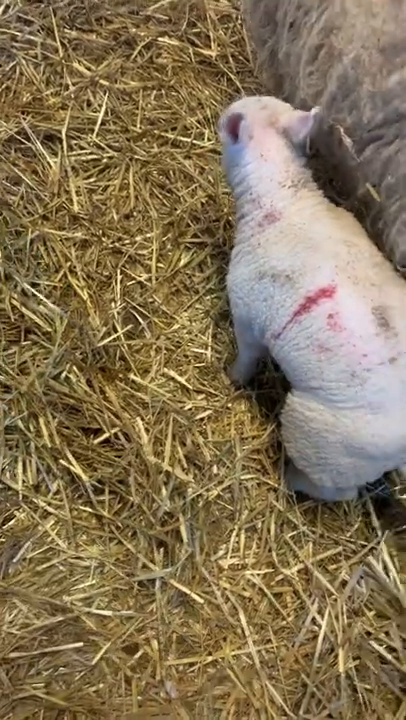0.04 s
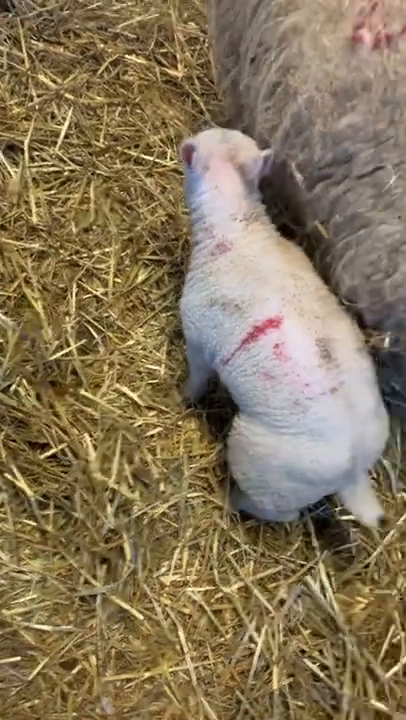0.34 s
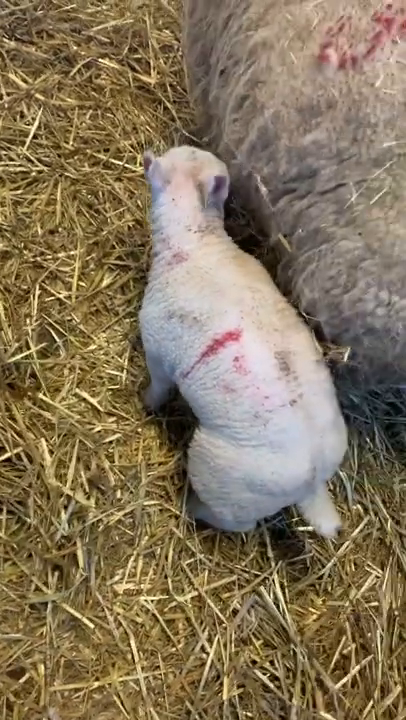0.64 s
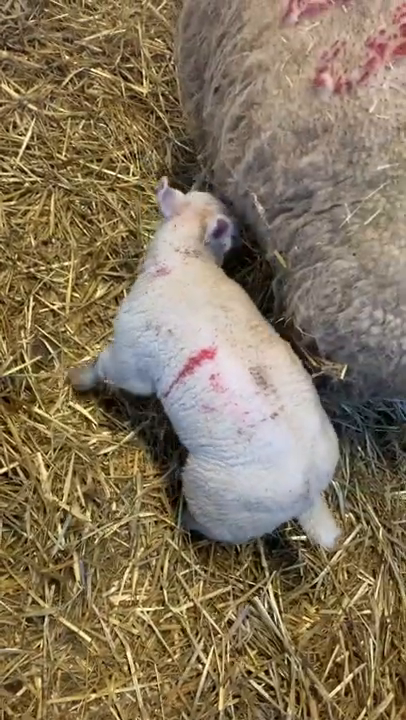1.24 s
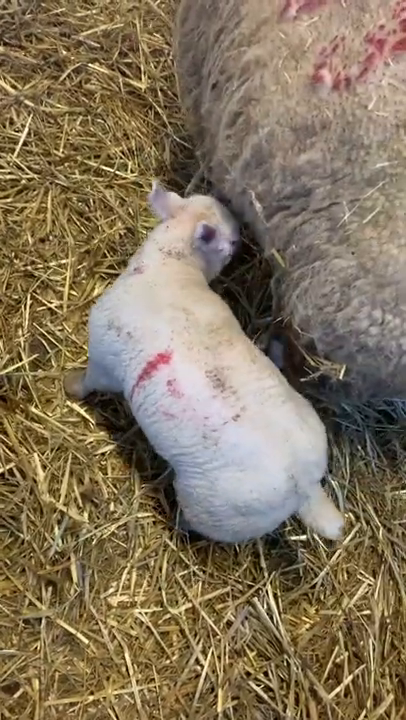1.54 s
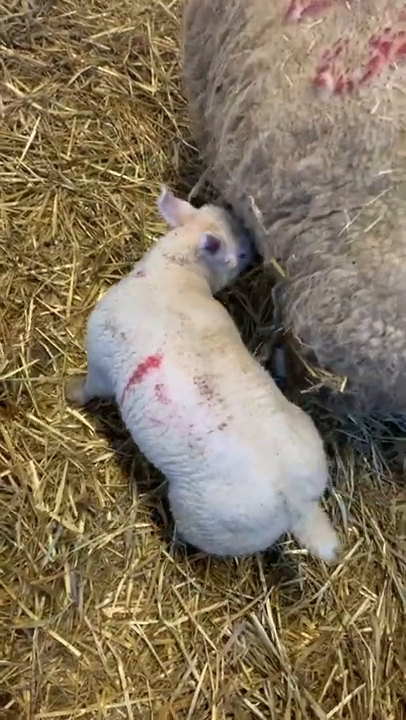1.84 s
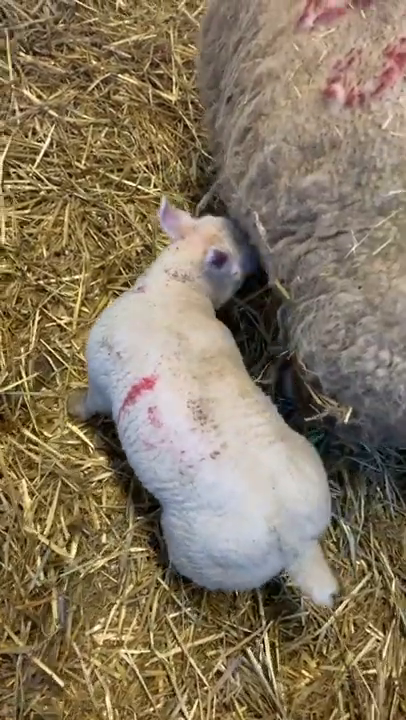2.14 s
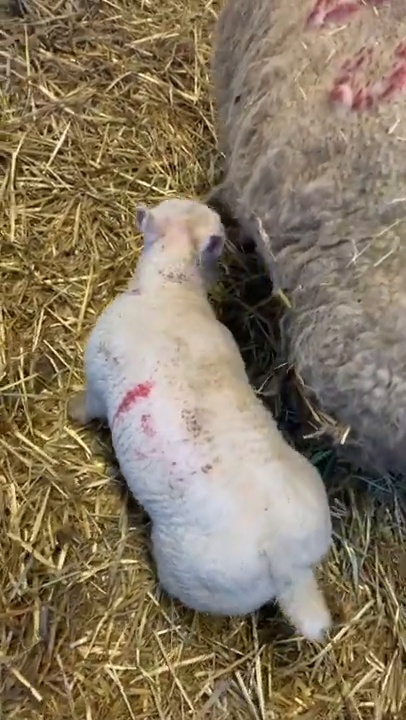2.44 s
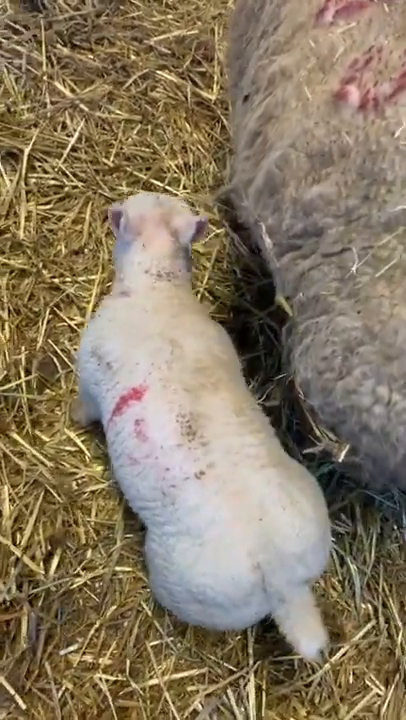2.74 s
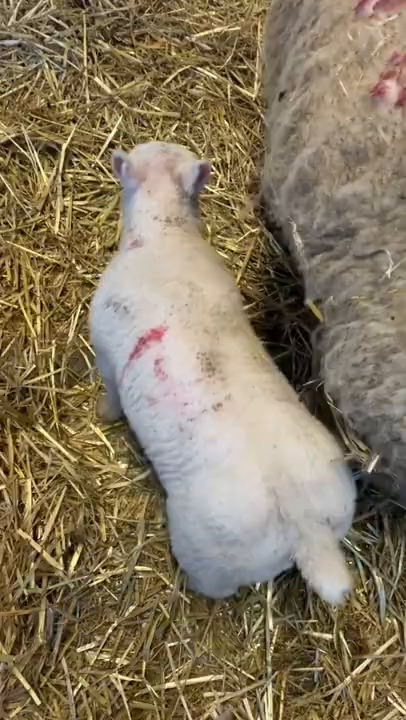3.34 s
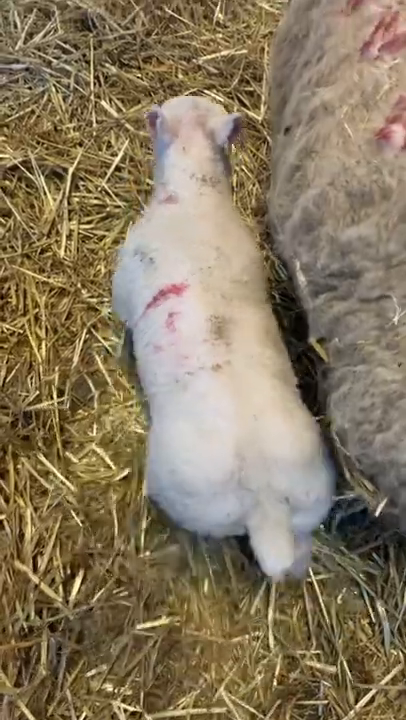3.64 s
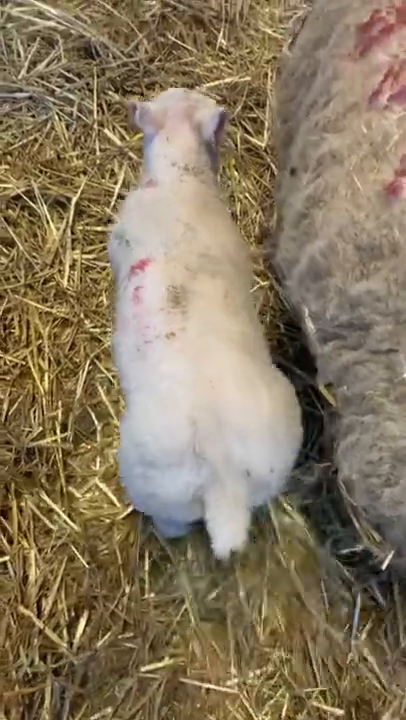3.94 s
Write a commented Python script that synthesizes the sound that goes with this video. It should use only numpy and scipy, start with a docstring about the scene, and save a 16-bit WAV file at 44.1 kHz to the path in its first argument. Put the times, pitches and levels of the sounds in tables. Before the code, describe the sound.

Straw rustles and crackles softly as a lamb shifts about, over a faint handling rumble.

```python
"""Straw rustles as a lamb shifts about in its pen, close to a hand-held pair of microphones.
Stalks slide over each other in an airy hiss that swells and fades. Single stalks tick, scrape
and snap, and about halfway through the straw crunches as the lamb presses on it.
The hand holding the microphones adds a low rumble; hand and hooves add a few soft bumps."""
import sys
import numpy as np
from scipy import signal
from scipy.fft import rfft, irfft
from scipy.io import wavfile

SR = 44100
rng = np.random.default_rng(int(sys.argv[2]) if len(sys.argv) > 2 else 0)


def transcribe(u):
    """Save the signal u as a 16-bit wav file named by the first command-line argument.

    u: samples, shape (n,) or (channels, n), limited to [-1, 1]; the rate is SR.
    q: integer samples, one column per channel.
    """
    v = np.clip(np.atleast_2d(u).T, -1, 1)
    q = np.round(v * 32767).astype(np.int16)
    wavfile.write(sys.argv[1], SR, q)


N = 176400

# How the rustle swells and fades (time [s], hiss level [dB], whoosh level [dB], top treble level [dB])
RUSTLE_LEVELS = [(0, -51.5, -58.5, -58), (.13, -49, -59.5, -52), (.31, -41, -55, -44), (.43, -50, -56, -53),
                 (.56, -47.5, -57, -54), (.61, -54, -64.5, -61), (.69, -56, -62.5, -65.5),
                 (.76, -48, -59, -56), (.84, -51.5, -62.5, -60), (1.02, -40, -59.5, -48.5),
                 (1.1, -43, -60, -48.5), (1.18, -51.5, -61, -58.5), (1.3, -53.5, -64, -55),
                 (1.54, -42, -56.5, -47), (1.82, -44, -58, -48), (1.87, -49, -64, -59),
                 (2.05, -56.5, -67.5, -66), (2.11, -56.5, -54.5, -72), (2.2, -56.5, -63.5, -68),
                 (2.34, -57.5, -67, -85), (2.5, -54, -70.5, -60), (2.6, -56, -66.5, -65),
                 (2.75, -47, -66, -52.5), (2.88, -55, -69, -66), (2.97, -51, -64.5, -63),
                 (3.07, -43.5, -64, -49.5), (3.16, -49.5, -59, -54), (3.29, -50.5, -60.5, -53),
                 (3.33, -43, -57, -45.5), (3.39, -40.5, -53, -40.5), (3.48, -38.5, -48, -41.5),
                 (3.59, -48, -56, -48), (3.65, -51.5, -67, -61), (3.81, -50, -61.5, -49.5),
                 (3.88, -48.5, -60.5, -45.5), (3.99, -43.5, -58, -48.5)]
# Tone colours of those three parts (frequency [Hz], level [dB])
HISS_COLOUR = [(1000, -18), (2200, -12), (3300, -2.5), (4500, -0.5), (6300, 1), (7500, -2.5), (8500, -2),
               (11000, -5.5), (13000, -31), (16000, -38)]
WHOOSH_COLOUR = [(200, -17), (450, -6), (900, -1), (1500, 0.5), (2200, -4), (3500, -9.5), (7000, -43)]
TOP_COLOUR = [(7000, -34), (10500, 0.5), (12500, -1.5), (14200, -0.5), (15600, 0), (17000, -22)]
# How the hand's noise swells and fades (time [s], rumble level [dB], rub level [dB])
HAND_LEVELS = [(0, -60.5, -68), (.35, -64, -57), (.43, -57.5, -62), (.56, -57, -56.5), (.68, -63.5, -71),
               (.78, -56.5, -64), (.85, -69.5, -67), (1.03, -58.5, -65.5), (1.35, -54, -60.5),
               (1.71, -61.5, -67), (2.25, -62, -65), (2.33, -68.5, -68), (2.62, -55.5, -69.5),
               (2.88, -55.5, -68.5), (3.12, -53.5, -56.5), (3.32, -62.5, -69.5), (3.59, -63, -59.5),
               (3.67, -61.5, -71.5), (3.99, -61.5, -74)]
# Tone colours of those two parts (frequency [Hz], level [dB])
RUMBLE_COLOUR = [(20, -54), (36, -19), (52, 0.5), (90, -2), (140, -4.5), (200, -13.5), (400, -43),
                 (1200, -70)]
RUB_COLOUR = [(80, -29), (180, 1), (300, -3.5), (450, -5), (800, -16.5), (2500, -60)]
# Short scrapes (time [s], length [s], level [dB], centre pitch [Hz])
SCRAPES = [(.315, 0.1, -54, 1230), (0.737, 0.075, -57, 422), (1.295, 0.059, -56, 600),
           (2.093, 0.025, -54, 1300), (2.203, 0.021, -49.5, 6500), (2.559, 0.011, -54, 5900),
           (3.083, 0.054, -50, 312), (3.171, 0.086, -55.5, 326), (3.357, 0.27, -47.5, 2920),
           (3.843, 0.016, -38.5, 7000)]
# Thuds of hand and hooves (time [s], pitch [Hz], level [dB], fade time [s])
THUDS = [(0.451, 140, -40, 0.0089), (0.556, 256, -47, 0.013), (0.59, 109.6, -40, 0.019),
         (1.303, 123, -42, 0.014), (1.393, 120, -40, .016), (1.534, 108, -40.5, 0.023),
         (1.852, 76, -42, 0.014), (2.155, 180.3, -43.5, 0.026), (3.061, 105, -43, .018),
         (3.084, 293, -30, 0.0034), (3.086, 89, -37.5, 0.017), (3.19, 215, -49, 0.016)]
# Stalks breaking or flicking (time [s], knock level [dB], crack level [dB], knock pitch [ratio])
STALK_SNAPS = [(0.548, -75, -45, 2.6), (0.757, -70, -53.5, 2), (1.0196, -67, -37.5, 2.4),
               (1.2998, -57, -46.5, 2.2), (1.3339, -59, -47, 2), (1.4326, -51, -45, 2.3),
               (1.519, -56, -38, 2), (1.6122, -51, -43, 1.4), (1.6245, -51, -47, 1.1),
               (1.9642, -60, -46.5, 1.94), (2.0876, -41.5, -42, 1), (2.095, -41, -42, 0.97),
               (2.1216, -57, -45.5, 1.5), (2.163, -64, -53, 2.3), (2.1925, -55, -51, 1),
               (2.2382, -56, -44.5, 2.04), (2.2759, -53, -44, 2.57), (2.358, -59.5, -51.5, 0.69),
               (2.5619, -52, -46.5, 2.2), (2.9434, -76, -51.5, 1.8), (3.0898, -62, -44.5, 2.3),
               (3.2345, -53, -46, 2.2), (3.38, -62, -37, 3.2), (3.6024, -46, -45, 1.23),
               (3.6081, -39, -33.5, 1.58), (3.6137, -47, -49, 1.34), (3.8432, -67, -52, 4.3),
               (3.876, -68, -42.5, 3)]
# Tones a stalk rings with at pitch ratio 1 (frequency [Hz], level [dB], fade time [s])
STALK_TONES = [(967, -0.5, 0.0014), (1880, -4.5, 0.0012), (2290, -1, 0.00093), (2970, -3.5, 0.00084)]
# Tone colour of cracking straw (frequency [Hz], level [dB])
CRACK_COLOUR = [(800, -33), (2200, -29), (3500, -1), (6500, 0), (9000, -7), (11500, -2.5), (16000, -5.5)]
# How alike the two microphones sound (frequency [Hz], likeness [0 to 1])
MIC_LIKENESS = [(50, 1), (140, 0.96), (300, 0.75), (700, 0.24), (1500, 0.34), (2600, 1), (3600, 0.81),
                (4600, 1), (9000, 1), (15000, 0.79)]
# How far the wave at the left microphone is ahead (frequency [Hz], phase lead [radians])
LEFT_LEAD = [(0, 0), (300, .05), (1000, .8), (1900, 1.2), (2500, 1.9), (3500, 1.7), (4700, 3.14),
             (6950, 6.28), (8950, 9.42), (11100, 12.57), (13100, 15.71), (15300, 18.85), (17000, 21)]

CRACK_FADE_S, SNAP_DELAY_S = .0006, .0008
LEAN_RIGHT_DB = [[-.8], [.8]]  # left, right


def gain(db):
    """Turns decibels into a number to multiply a sound by."""
    return 10 ** (np.asarray(db) / 20)


def normalise(x):
    """Scales a signal to an average strength (rms) of 1."""
    return x / np.sqrt(np.mean(x ** 2) + 1e-20)


def look_up(table, hz):
    """Reads between the rows of a frequency table, spacing them as the ear hears pitch."""
    freqs, values = np.transpose(table)
    return np.interp(np.log(hz + 1), np.log(freqs + 1), values)


def loudness_curves(table):
    """Makes one gain curve for each level column of a time table."""
    times, *columns = np.transpose(table)
    return [gain(np.interp(np.arange(N) / SR, times, column)) for column in columns]


def add(mix, start_s, sound):
    """Mixes a stereo sound in at the given time."""
    part = mix[:, round(start_s * SR):][:, :sound.shape[1]]
    part += sound[:, :part.shape[1]]


def at_microphones(pair, colour):
    """Colours two unrelated signals and blends them into what two spaced microphones hear, at rms 1."""
    size = pair.shape[1]
    hz = np.fft.rfftfreq(size, 1 / SR)
    left, other = rfft(pair) * gain(look_up(colour, hz))
    likeness = np.clip(look_up(MIC_LIKENESS, hz), 0, .995)
    right = likeness * left + np.sqrt(1 - likeness ** 2) * other
    lag = np.exp(-1j * np.interp(hz, *np.transpose(LEFT_LEAD)))
    return normalise(irfft(np.array([left, right * lag]), size))


def patchy(pair, depth_db, width_hz, length_s, size=1024):
    """Narrow bands of pitch come and go, as when different stalks touch."""
    frames = dict(nperseg=size, noverlap=size * 3 // 4)
    spectra = signal.stft(pair, **frames)[2]
    across = np.fft.fftfreq(spectra.shape[1], SR / size)[:, None] * width_hz
    along = np.fft.fftfreq(spectra.shape[2], size / 4 / SR) * length_s
    blur = np.exp(-(across ** 2 + along ** 2))  # smooths over pitch and time
    patches = np.fft.ifft2(np.fft.fft2(rng.standard_normal(spectra.shape[1:])) * blur).real
    return signal.istft(spectra * gain(depth_db * normalise(patches)), **frames)[1][:, :N]


def flutter(rate_hz, depth_db):
    """Makes a gain that wavers at random, mostly near the given rate."""
    hz = np.fft.rfftfreq(N, 1 / SR)
    band = hz / (hz + rate_hz / 2) / (1 + (hz / rate_hz) ** 2)
    return gain(depth_db * normalise(irfft(rfft(rng.standard_normal(N)) * band, N)))


def soft_noise(colour):
    """Makes gently shifting noise with the given tone colour."""
    noise = patchy(rng.standard_normal((2, N)), depth_db=3.5, width_hz=520, length_s=.082)
    return at_microphones(noise, colour)


def clicks(per_s, spread_db, max_spreads):
    """Scatters clicks of uneven size at random times."""
    sizes = gain(spread_db * np.minimum(rng.exponential(1, (2, N)), max_spreads))
    return sizes * (rng.random((2, N)) < per_s / SR)


def sliding_stalks(colour, crackle_share=.17):
    """Countless stalks slide, with tiny crackles where they catch."""
    crackles = normalise(clicks(per_s=900, spread_db=-3, max_spreads=4) * rng.choice([-1, 1], (2, N)))
    grain = np.sqrt(crackle_share) * crackles + np.sqrt(1 - crackle_share) * rng.standard_normal((2, N))
    return at_microphones(patchy(grain, depth_db=2.5, width_hz=620, length_s=.06), colour)


def rustle():
    """Moving straw makes a swelling, airy hiss with a softer whoosh below it."""
    hiss_curve, whoosh_curve, top_curve = loudness_curves(RUSTLE_LEVELS)
    hiss = hiss_curve * sliding_stalks(HISS_COLOUR)
    top = gain(-1.5) * top_curve * sliding_stalks(TOP_COLOUR)
    whoosh = gain(-1.5) * whoosh_curve * soft_noise(WHOOSH_COLOUR) * flutter(rate_hz=19, depth_db=.92)
    return (hiss + top + whoosh * gain(LEAN_RIGHT_DB)) * flutter(rate_hz=23.6, depth_db=.67)


def hand_noise():
    """The hand holding the microphones makes a low rumble and a dull rub."""
    rumble_curve, rub_curve = loudness_curves(HAND_LEVELS)
    rub = gain(.5) * rub_curve * soft_noise(RUB_COLOUR) * gain(LEAN_RIGHT_DB)
    rumble = gain(1.5) * rumble_curve * at_microphones(rng.standard_normal((2, N)), RUMBLE_COLOUR)
    return rumble + rub


def ticks():
    """Settling straw gives off faint, scattered ticks."""
    return gain(-65.5) * at_microphones(clicks(per_s=35, spread_db=-11, max_spreads=1), CRACK_COLOUR)


def scrapes(rise_share=.08):
    """Each scrape is a short puff of noise, strongest around one pitch."""
    out = np.zeros((2, N))
    t = np.arange(8192) / SR
    for start_s, length_s, db, hz in SCRAPES:
        shape = np.interp(t / length_s, [0, rise_share, 1], [0, 1, 0])
        colour = [(hz * 2. ** octave, -13 * abs(octave) ** 1.5) for octave in range(-3, 4)]
        add(out, start_s, gain(db) * shape * at_microphones(rng.standard_normal((2, t.size)), colour))
    return out


def thuds(rise_s=.0017):
    """Hand and hooves bump softly: each bump is a low tone that dies away fast."""
    out = np.zeros((2, N))
    t = np.arange(SR // 5) / SR
    for start_s, hz, db, fade_s in THUDS:
        shape = (1 - np.exp(-t / rise_s)) * np.exp(-t / fade_s)
        thud = gain(db) * shape * np.sin(2 * np.pi * hz * t)
        add(out, start_s, np.array([thud, thud]))
    return out


def knock(pitch, size=1792, right_delay_s=.000107):
    """A broken stalk rings briefly; the sound reaches the left microphone first."""
    t = np.maximum(np.arange(size) / SR - SNAP_DELAY_S - np.array([[0], [right_delay_s]]), 0)
    ring = np.zeros((2, size))
    for k, (hz, db, fade_s) in enumerate(STALK_TONES):
        fade = np.exp(-t * np.sqrt(pitch) / fade_s)
        ring += (-1) ** k * gain(db) * fade * np.sin(2 * np.pi * hz * pitch * t)
    brightened = np.gradient(ring, axis=1)
    return normalise(brightened) * np.sqrt(.01 * SR / size)  # as much energy as 10 ms at rms 1


def crack(size=2048, padding=256, tail_db=-20, tail_s=.005):
    """A stalk gives way with a very short, bright burst of noise and a faint tail."""
    t = np.maximum((np.arange(size) - padding) / SR - SNAP_DELAY_S, 0)
    shape = (t > 0) * (np.exp(-t / CRACK_FADE_S) + gain(tail_db) * np.exp(-t / tail_s))
    burst = at_microphones(shape * rng.standard_normal((2, size)), CRACK_COLOUR)
    return burst[:, padding:] * np.sqrt(.01 * SR / size)  # about as much energy as a knock


def snaps(trim_db=-2.5):
    """Single stalks break or flick: a woody knock, higher in thinner stalks, and a bright crack."""
    out = np.zeros((2, N))
    for start_s, knock_db, crack_db, pitch in STALK_SNAPS:
        add(out, start_s, gain(knock_db) * knock(pitch) + gain(crack_db) * crack())
    return gain(trim_db) * out


def crunch(start_s=2.08, end_s=2.4):
    """The lamb presses on the straw, which gives way in a dense, uneven run of tiny cracks."""
    pressure = np.interp(np.arange(N) / SR, [start_s - .02, start_s, end_s, end_s + .1], [0, 1, 1, 0])
    breaks = clicks(per_s=420, spread_db=2, max_spreads=2)
    fades = signal.lfilter([1], [1, -np.exp(-1 / (CRACK_FADE_S * SR))], breaks)  # a tail for each click
    return gain(-59) * pressure * at_microphones(fades * rng.standard_normal((2, N)), CRACK_COLOUR)


def scene():
    """Adds up the sounds of straw, hand and hooves."""
    return rustle() + hand_noise() + ticks() + scrapes() + thuds() + snaps() + crunch()


def record(dry, cutoff_hz=15850):
    """Cuts away the very highest treble."""
    low_pass = signal.firwin(511, cutoff_hz, window=("kaiser", 9), fs=SR)
    return signal.oaconvolve(dry, low_pass[None], "same")


dry = scene()
out = record(dry)
transcribe(out)
```